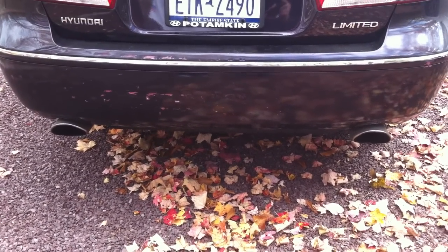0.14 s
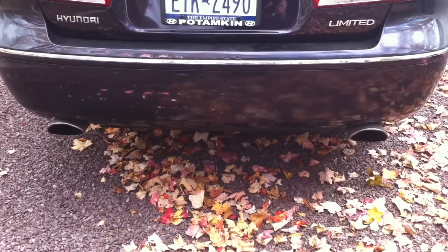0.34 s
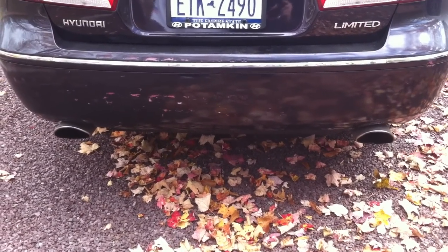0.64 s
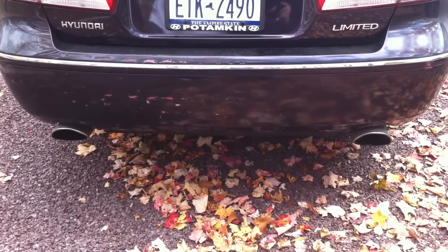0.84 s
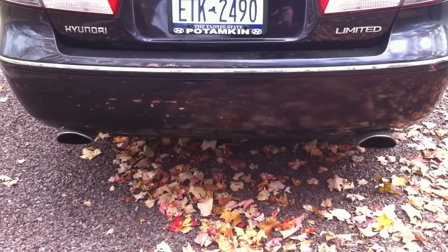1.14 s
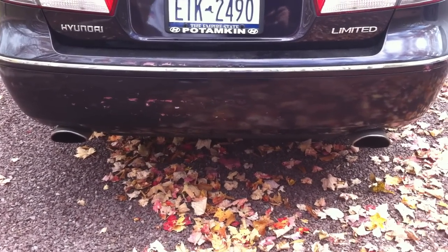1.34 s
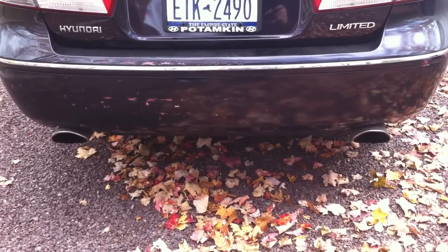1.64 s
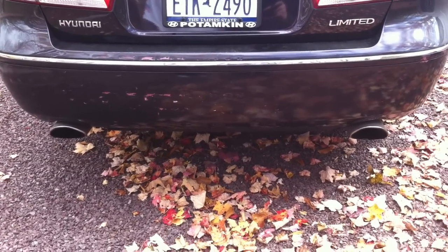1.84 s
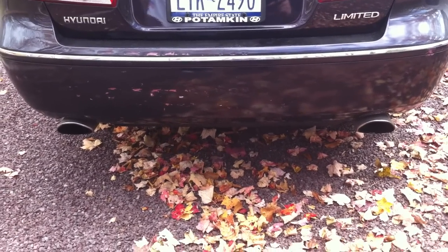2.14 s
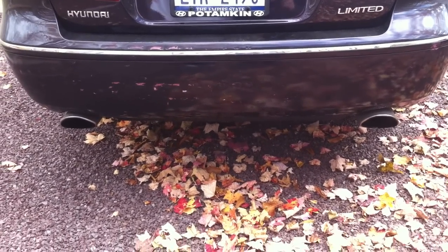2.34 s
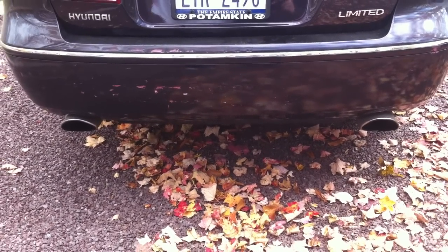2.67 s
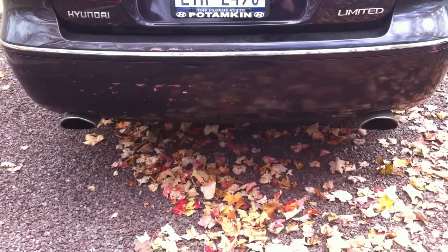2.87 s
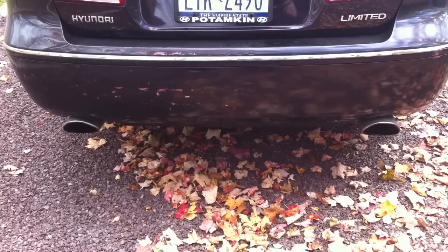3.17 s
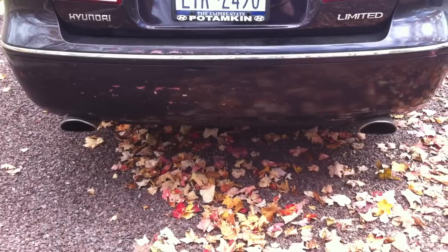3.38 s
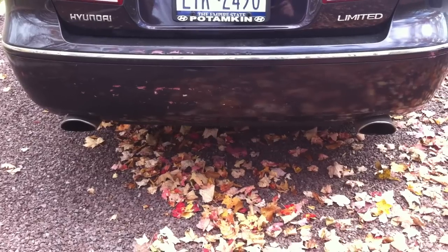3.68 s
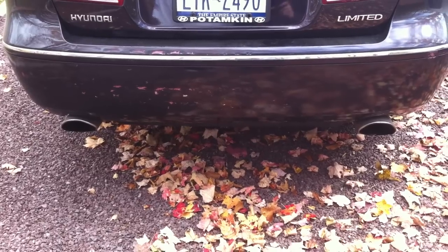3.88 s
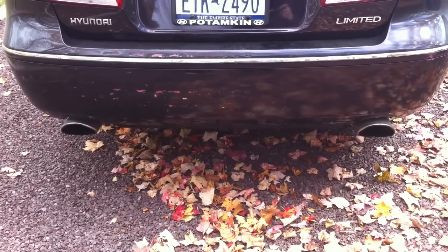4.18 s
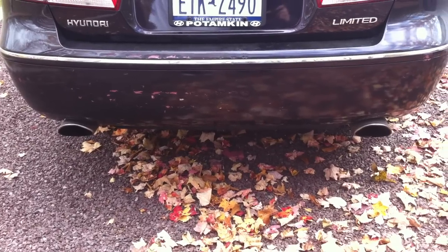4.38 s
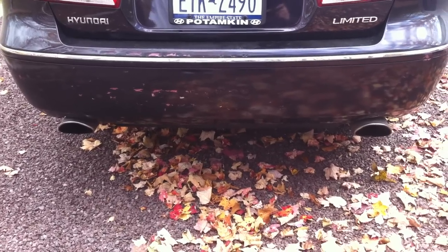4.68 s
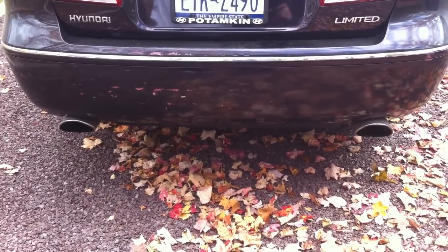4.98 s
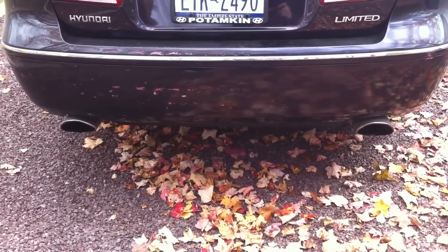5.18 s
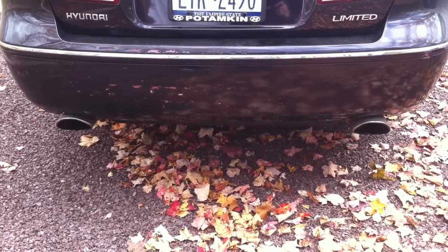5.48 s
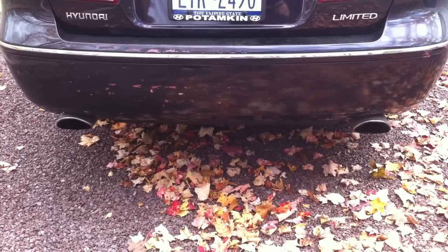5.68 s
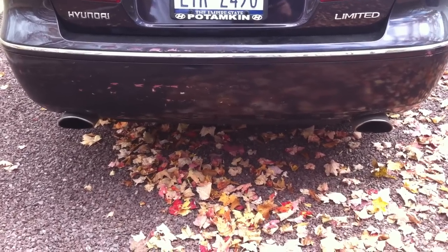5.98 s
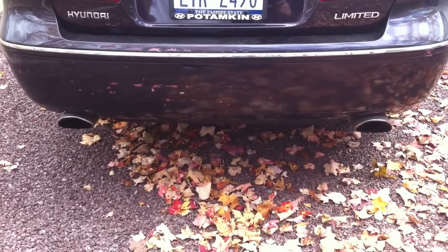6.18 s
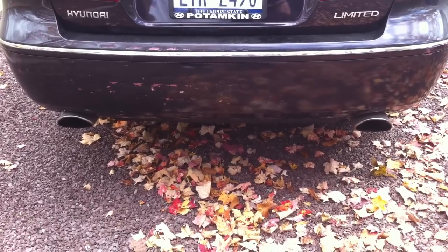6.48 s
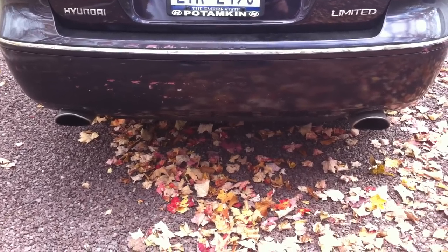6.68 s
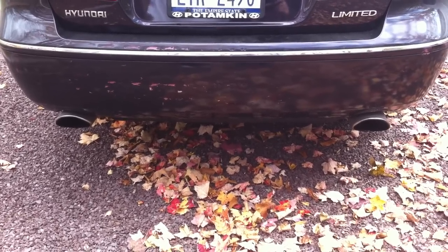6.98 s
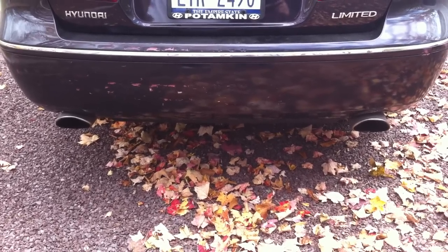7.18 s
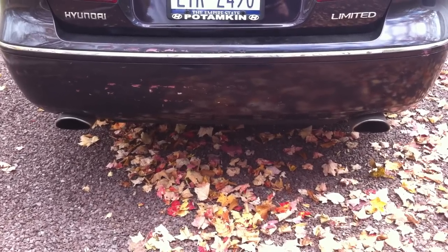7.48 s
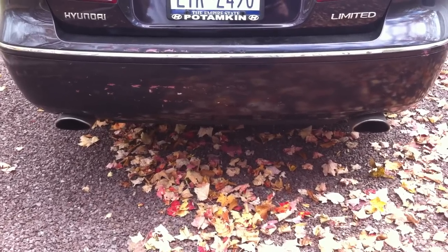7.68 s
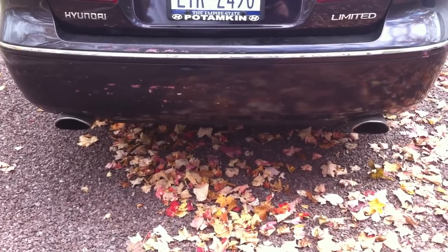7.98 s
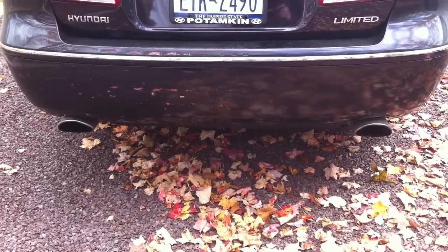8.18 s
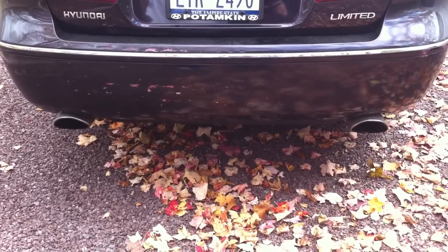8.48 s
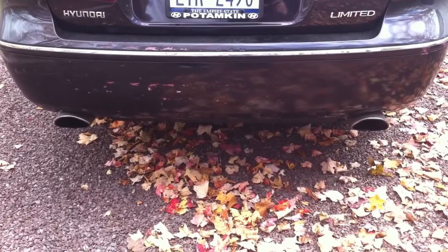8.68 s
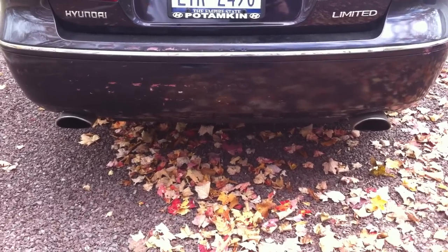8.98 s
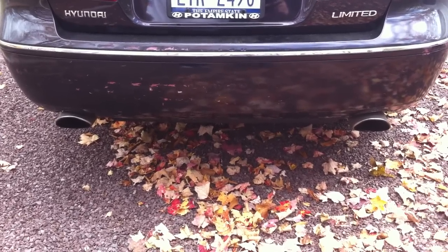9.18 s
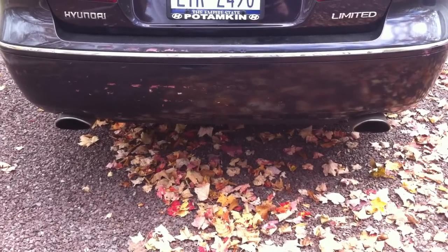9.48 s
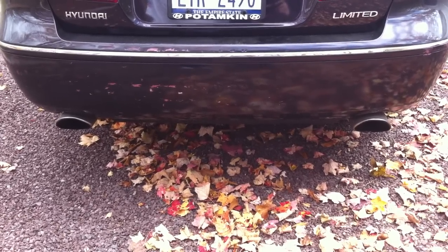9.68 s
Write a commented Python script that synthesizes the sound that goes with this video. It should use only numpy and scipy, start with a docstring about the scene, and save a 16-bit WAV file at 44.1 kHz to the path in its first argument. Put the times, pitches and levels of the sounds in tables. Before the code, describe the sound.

A steady, throaty car exhaust drone heard from just behind the bumper, outdoors. Tiny irregular dips make it burble, with rumbling gas and breathy hiss pulsing at the firing rate. Wet spitting flicks occur near the first second. Later the engine lifts briefly, turns smoother, and fades noticeably in level, leaving a quieter low hum, soft mechanical whirr and very faint thin whine.

```python
"""On asphalt, just behind twin tail pipes: a six-cylinder car idles fast after a cold start.
The firing note is a stack of sine waves; it wavers, rises a little, sinks back and grows quieter.
Gas rumbles and hisses in puffs, made of shaped noise that swells with each firing.
Short noise bursts are wet spits; steady noise is an engine bay whirr over a low street rumble.
Faint thin sine tones rise from 6.5 to 7.6 s and then hold, wavering a little."""
import sys
import numpy as np
from scipy import signal
from scipy.io import wavfile
from scipy.ndimage import uniform_filter1d

SR = 44100
rng = np.random.default_rng(int(sys.argv[2]) if len(sys.argv) > 2 else 0)


def dump_mix(stems):
    """Bounce the given channels to the path in sys.argv[1] as a 16-bit WAV at rate SR."""
    frames = np.atleast_2d(stems).T  # one column per channel
    limited = np.clip(frames, -1, 1)  # hard clip at full scale
    pcm = np.round(limited * 32767).astype(np.int16)
    wavfile.write(sys.argv[1], SR, pcm)


N = 433492  # length in samples

# How the exhaust pulses change over time, before weak burns and small wavering act on them:
# (time_s, order_1_db, order_2_db, order_3_db, order_4_db, order_5_db, upper_buzz_db, bank_mismatch_db)
# Order k is a tone at k times the firing rate.
EXHAUST_LEVELS = [(0.4, -38.3, -17, -16.0, -23, -41.5, -44, -26.5),
                  (1.5, -39.1, -17.5, -16, -23.5, -41, -45.4, -27),
                  (2.2, -39.1, -17.2, -15.5, -23.2, -43, -45.8, -27),
                  (3.0, -38.8, -17.0, -15, -23, -42, -45.5, -26.5),
                  (3.6, -40, -17.5, -15.5, -23.5, -40.5, -47, -28),
                  (4.1, -39.5, -17.1, -15, -23.5, -42, -47, -27.3),
                  (4.55, -40.4, -17.6, -16, -24.2, -41, -49, -28.6),
                  (4.95, -39.0, -17, -14.5, -23.5, -41, -46.5, -27.5),
                  (5.5, -39.2, -16.8, -14.5, -24.0, -40, -47.2, -28),
                  (6.2, -40.5, -18, -16, -25.5, -41, -50, -29),
                  (6.45, -38.5, -16.5, -14, -22.8, -45, -43.5, -26.7),
                  (6.75, -38, -17.1, -15, -21.9, -46, -42, -27.6),
                  (7.38, -40.5, -19.5, -17, -24.5, -50, -47.5, -30.3),
                  (7.54, -39, -19.5, -18.5, -21, -45, -44.5, -30.5),
                  (8.04, -40, -22, -20, -23, -48, -48, -31.6),
                  (8.6, -43.5, -25.6, -21.5, -26.3, -54, -55.0, -35),
                  (8.9, -46, -26.0, -22, -27, -60, -56.0, -36.5),
                  (9.15, -48.5, -26.5, -22, -30.0, -63.0, -64, -37.8),
                  (9.5, -51.5, -24, -23, -35.4, -51.8, -61.7, -38.9)]


def amp(db):
    """Turn decibels into a plain multiplier."""
    return 10 ** (np.asarray(db) / 20)


def evened(x):
    """Scale a signal to an rms (average strength) of 1."""
    return x / np.sqrt(np.mean(x ** 2) + 1e-20)


def columns(rows):
    """Draw each column of a table as a curve over time, one value per sample."""
    time_s, *values = np.transpose(rows)
    return [np.interp(np.arange(N) / SR, time_s, v) for v in values]


def wander(low_hz, high_hz):
    """Smooth random wavering of rms 1: 30 slow sine waves with random starts, the slowest strongest."""
    t = np.arange(0, N + 64, 64) / SR
    hz = np.geomspace(low_hz, high_hz, 30)[:, None]
    waves = np.sin(2 * np.pi * (hz * t + rng.random((30, 1)))) / np.sqrt(hz)
    return np.interp(np.arange(N) / SR, t, evened(waves.sum(0)))


def noise(spectrum, size, patchy_db):
    """Noise of rms 1 with a given tone colour, built from short random spectra with drifting patches."""
    hz = np.fft.rfftfreq(size, 1 / SR)
    frames = N // (size // 4) + 5
    real, imaginary, patches = rng.standard_normal((frames, len(hz), 3)).T
    patches = uniform_filter1d(patches, size=8, axis=0)  # smooth across pitch
    patches = evened(uniform_filter1d(patches, size=10, axis=1))  # smooth across time
    pitch_hz, level_db = np.transpose(spectrum)
    shape_db = np.interp(np.log(hz + 1), np.log(pitch_hz), level_db, left=-90, right=-90)
    spectra = (real + 1j * imaginary) * amp(shape_db[:, None] + patchy_db * patches)
    return evened(signal.istft(spectra, nperseg=size, noverlap=size - size // 4)[1][:N])


def staged(levels_db):
    """A level that passes from the cold idle through a surge to a settled and then a sinking idle."""
    cold, surging, settled, sinking = levels_db
    return columns([(6.2, cold), (6.55, surging), (7.25, surging),
                    (7.55, settled), (8.5, settled), (9.35, sinking)])[0]


def stumble():
    """Weak burns briefly slow the crank: the change of firing rate in Hz, zero or negative."""
    # weak burns: (time_s, firing_rate_drop_hz)
    weak_burns = [(0.08, 0.79), (0.36, 0.57), (0.64, 0.39), (0.93, 0.93), (1.33, 0.42), (1.62, 0.81),
                  (1.93, 0.48), (2.34, 1.16), (2.79, 0.64), (3.02, 1.1), (3.29, 0.49), (3.67, 0.91),
                  (4.04, 0.44), (4.48, 0.59), (4.77, 1.02), (5.39, 0.66), (5.61, 0.88), (5.78, 0.73),
                  (6.1, 0.6), (7.0, 0.46), (7.32, 0.39), (7.87, 0.23)]
    half_length_s = .045
    t = np.arange(0, N + 64, 64) / SR
    drops = sum(-hz * np.exp(-((t - s) / half_length_s) ** 2) for s, hz in weak_burns)
    return np.interp(np.arange(N) / SR, t, drops)


def firing_turns():
    """Count the firings so far by adding up the firing rate, which wavers and dips at weak burns."""
    # firing rate before the weak burns and wavering: (time_s, rate_hz)
    base_rate = [(0.04, 68.38), (1.1, 68.11), (1.7, 67.71), (2.62, 68.1), (3.1, 68.35), (3.5, 67.62),
                 (4.01, 68.1), (4.55, 67.39), (4.85, 68.4), (5.53, 68.2), (6.22, 67.31), (6.44, 69.39),
                 (6.79, 70.24), (7.37, 69.96), (7.47, 71.31), (8.29, 71.89), (8.62, 71.9), (9.17, 70.53),
                 (9.57, 68.23), (9.78, 68.07)]
    firing_hz = columns(base_rate)[0] + stumble() + .07 * wander(3, 12)
    return np.cumsum(firing_hz) / SR + 0.18


def order(k, db, turns, off_beat=0):
    """A tone at k times the firing rate; the pipes shift its phase (radians) according to its pitch."""
    muffler = .58 + 3 * np.log(np.cosh((k - 3) / 2.1))  # holds back the boom; higher orders arrive first
    pipe_mode = -2.5 / (1 + np.exp((6.6 - k) / .6))  # orders above this resonance lag
    phase = 2 * np.pi * k * turns + muffler + pipe_mode + off_beat
    return np.sqrt(2) * amp(db) * np.cos(phase)


def uneven_cylinder(turns, order_3_db):
    """One cylinder burns unlike the rest, adding tones at sixths of the firing rate."""
    # which multiples of one sixth of the firing rate sound
    sixths = [10, 11, 13, 14, 16, 17, 19, 20, 22, 23, 25, 26, 28, 29]
    # their levels relative to order 3, before wavering: (cold_db, surging_db, settled_db, sinking_db)
    sixth_levels = [(-39, -34, -37, -37), (-28, -28, -29, -31), (-35, -35, -38, -32), (-40, -38, -38, -32),
                    (-34, -35, -33, -32), (-28, -25, -20, -29), (-25, -29, -26, -20), (-45, -43, -35, -28),
                    (-41, -43, -38, -41), (-36, -34, -27, -27), (-28, -33, -28, -18), (-35, -41, -36, -21),
                    (-52, -53, -41, -47), (-46, -34, -35, -40)]
    odd_turns = turns - .24  # the odd cylinder's surplus trails its pulse
    return sum(order(k / 6, order_3_db + staged(db) + wander(1, 6), odd_turns, 4.7)
               for k, db in zip(sixths, sixth_levels))


def exhaust_note(turns):
    """Pressure pulses as a stack of orders; the two cylinder banks differ, which gives the half orders."""
    # orders 1.5, 2.5, 3.5, 4.5 relative to the bank mismatch, before wavering:
    # (cold_db, surging_db, settled_db, sinking_db)
    half_orders = [(-2, -2, -2, -1), (-5, -6, -5, -9), (-10, -12, -11, -12), (-13, -22, -24, -23)]
    # orders 5.5, 6, 6.5 and so on relative to the upper buzz, before wavering:
    # (cold_db, surging_db, settled_db, sinking_db)
    high_orders = [(-3, -9, -14, -4), (-7, -13, -18, -8), (-10, -17, -11, -8), (-2, -2, -4, -2),
                   (-7, -12, -11, -18), (-4, -5, -2, -4), (-7, -13, -18, -12), (-3, -15, -16, -2),
                   (-25, -27, -20, -18), (-16, -17, -19, -17), (-13, -20, -12, -13), (-15, -17, -20, -12),
                   (-17, -22, -22, -21), (-24, -26, -24, -20), (-20, -27, -21, -19), (-21, -21, -29, -23),
                   (-20, -29, -27, -21), (-25, -31, -23, -19), (-24, -33, -29, -26), (-24, -33, -29, -20),
                   (-27, -33, -30, -26), (-26, -33, -30, -26), (-22, -30, -28, -26), (-25, -33, -30, -26),
                   (-25, -33, -32, -26), (-29, -33, -26, -24), (-22, -30, -30, -26)]
    *whole_db, buzz_db, mismatch_db = columns(EXHAUST_LEVELS)
    buzz_db = buzz_db + 3.0 * stumble()  # weak burns sound duller
    second_bank = -1.9  # radians: its pulses come off the beat more than weaker
    note = uneven_cylinder(turns, whole_db[2])

    turns = turns + .0008 * wander(5, 25)  # no two firings burn alike
    whole_db[4] = whole_db[4] - 1.2 * stumble()  # the fifth order nearly keeps its level in a weak burn
    note += sum(order(k + 1, db, turns) for k, db in enumerate(whole_db))
    for k, db in enumerate(half_orders):
        level_db = mismatch_db + staged(db) + .7 * wander(1, 8)
        note += order(k + 3 / 2, level_db, turns, second_bank)

    # the sharp pulse fronts space unevenly round the cycle of six firings
    turns = turns + .004 * np.sin(2 * np.pi * turns / 6)
    for k, db in enumerate(high_orders):
        off_beat = 0 if k % 2 else second_bank  # only half orders take the bank's shift
        off_beat += (k > 9) * rng.normal(0, 1.5)  # reflections in the pipes scatter the top orders
        level_db = buzz_db + staged(db) + .8 * wander(1, 8)
        note += order((k + 11) / 2, level_db, turns, off_beat)
    return note * amp(1.4 * stumble() + 0.23 * wander(2.3, 9))  # weak burns sound softer


def puffs(turns, sharpness, weak_bank):
    """Gas flow at each firing: a quick rise and slower fall, weaker from the second bank."""
    strength = amp(1.2 * rng.standard_normal(N // 400))[turns.astype(int)]  # one chance per firing
    since = turns % 1  # part of a firing gone by
    bank = np.where(turns % 2 < 1, 1, weak_bank)  # banks take turns
    return 1 + sharpness * bank * strength * since / 0.23 * np.exp(1 - since / .15)


def gas(turns):
    """Turbulent rumble in the pipes and hiss at their mouths, both pushed by each firing."""
    # tone colour of the rumble in the pipes: (pitch_hz, relative_level_db)
    rumble_colour = [(25, -25.5), (55, -25.5), (90, -14.5), (140, -6.5), (290, -4), (330, -9), (430, -18.5),
                     (560, -12), (660, -20.5), (800, -25), (1300, -29), (2000, -36)]
    # tone colour of the gas leaving the pipes: (pitch_hz, relative_level_db)
    hiss_colour = [(530, -30), (900, -5.5), (1060, -13), (1770, -8.5), (2120, -5), (2300, -7), (2660, -2.5),
                   (2960, -3.5), (3330, -11), (4180, -17.5), (5430, -11.5), (7060, -20.5), (9060, -20),
                   (10600, -14.5), (16200, -30)]
    # how the gas flow changes: (time_s, relative_level_db)
    gas_flow = [(0.9, -56.5), (1.88, -57.5), (4.6, -58.5), (4.9, -57.5), (6.22, -58.8), (6.56, -57),
                (7.0, -57.5), (7.1, -59.3), (7.47, -60), (7.57, -59), (8.5, -63.5), (9.7, -65.5)]
    load_db = columns(EXHAUST_LEVELS)[6]  # the rumble follows the bank mismatch level
    flow_db = columns(gas_flow)[0]
    rumble = noise(rumble_colour, size=2048, patchy_db=1) * evened(puffs(turns + 1.4, .4, .5))
    hiss = noise(hiss_colour, size=512, patchy_db=1.0) * evened(puffs(turns + 1.2, 1.1, 0.23))
    rumble_db = load_db - 13.5 + 3.0 * stumble()
    hiss_db = flow_db + 5.5 + 1.4 * stumble() + .5 * wander(1.8, 9.4)
    return amp(rumble_db) * rumble + amp(hiss_db) * hiss


def engine_whirr():
    """Steady whirr from the engine bay, as shaped noise."""
    # tone colour of the whirr: (pitch_hz, relative_level_db)
    whirr_colour = [(470, -42), (800, -13), (976, -9.5), (1490, -15.5), (1620, -4), (1980, -6),
                    (2210, -0.5), (2660, -11.5), (3010, -0.5), (3680, -19), (5140, -12.5), (6340, -25.5),
                    (6920, -20.5), (7730, -25.5), (16200, -25)]
    return amp(-60) * noise(whirr_colour, size=1024, patchy_db=2.5)


def street_rumble():
    """A low outdoor rumble of shaped noise that eases off near the end."""
    # tone colour of the street: (pitch_hz, relative_level_db)
    street_colour = [(20, -1), (45, -3), (60, -4), (150, -6), (700, -12.5), (1200, -30.5)]
    easing_db = columns([(7, 0), (9.5, -3.5)])[0]
    return amp(-60.5 + easing_db) * noise(street_colour, size=4096, patchy_db=2.0)


def spits():
    """Short bright bursts of water thrown from the pipes: noise that swells and fades in milliseconds."""
    # the loudest wet spits: (start_s, relative_level_db)
    spit_times = [(0.814, -34), (1.07, -49), (1.1894, -47.5)]
    t, level = np.arange(2600) / SR, np.zeros(N)
    for start_s, db in spit_times:
        level[round(start_s * SR)] = amp(db)
    swell = t / .008 * np.exp(1 - t / .008)  # strongest after 8 ms
    burst = signal.oaconvolve(level, swell)[:N]
    colour = [(500, -2.5), (1000, 0.5), (1800, -10), (2800, -14), (4200, -24), (5500, -19),
              (7500, -27), (10000, -20), (15000, -30)]  # (pitch_hz, relative_level_db)
    return amp(-7.5) * burst * noise(colour, size=256, patchy_db=2.0)


def whine():
    """Thin tones that waver a little in pitch and level, faint at first, stronger from 7.6 s."""
    # thin tones, before wavering: (pitch_hz, relative_level_db)
    thin_tones = [(1830, -74.5), (2283, -73.5), (2616, -76), (2783, -74), (2950, -74)]
    total = np.zeros(N)
    for hz, db in thin_tones:
        level = amp(db + 2.7 * wander(.5, 4))
        cycles = np.cumsum(hz + 3 * wander(0.28, 3.3)) / SR
        total += level * np.sin(2 * np.pi * cycles)
    rise_db = columns([(6.5, -11.5), (7.6, 1)])[0]
    return np.sqrt(2) * amp(rise_db) * total


def scene():
    """Add up all the sounds; the note and the gas share one count of firings."""
    turns = firing_turns()
    engine = exhaust_note(turns) + gas(turns) + engine_whirr()
    return (engine + street_rumble() + spits() + whine())[None]


def record(dry):
    """Cut the treble above 15760 Hz with a steep filter."""
    low_pass = signal.firwin(1023, 15760, window=("kaiser", 9), fs=SR)
    return signal.oaconvolve(dry, low_pass[None], "same")


dry = scene()
out = record(dry)
dump_mix(out)
```